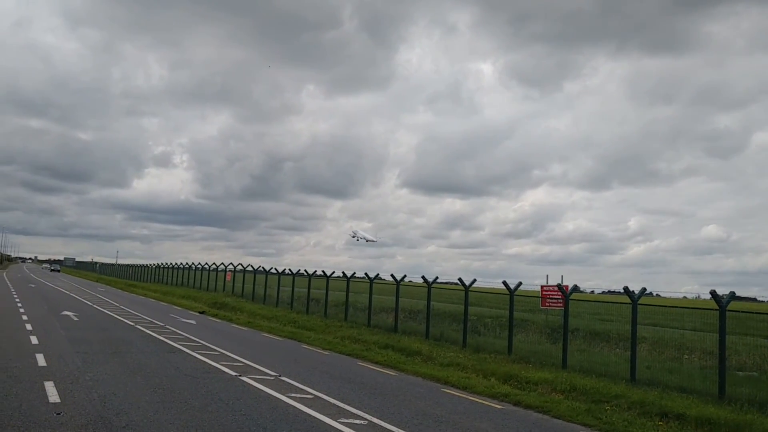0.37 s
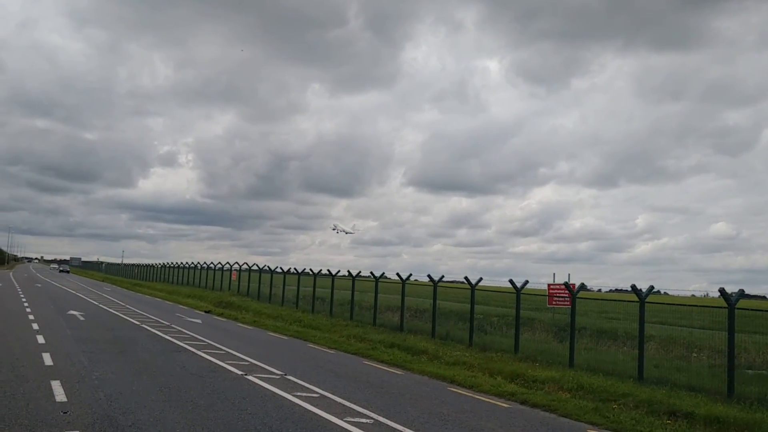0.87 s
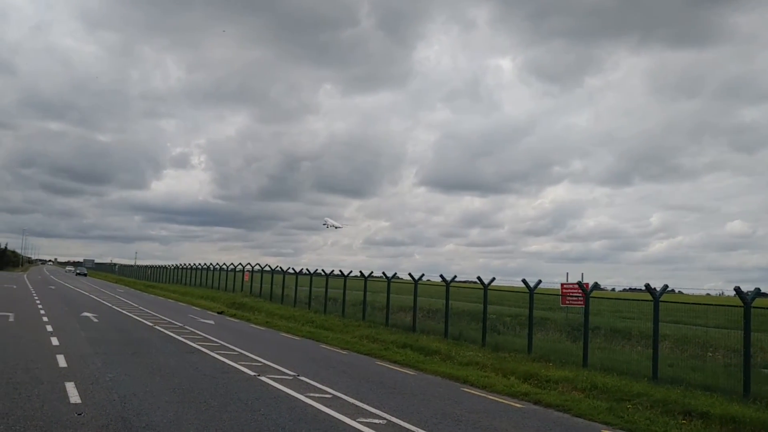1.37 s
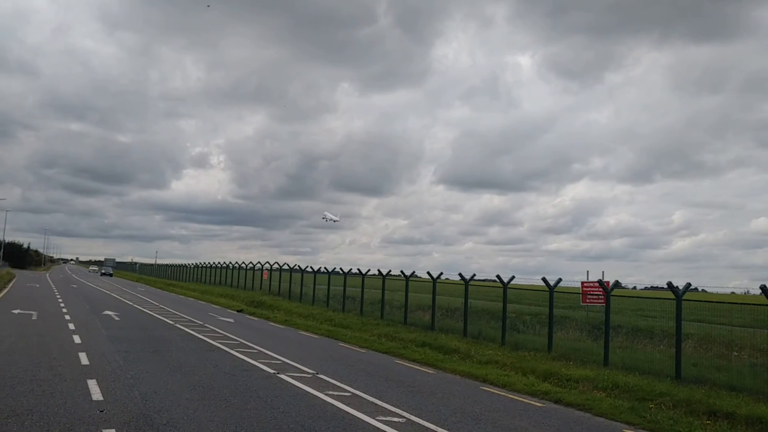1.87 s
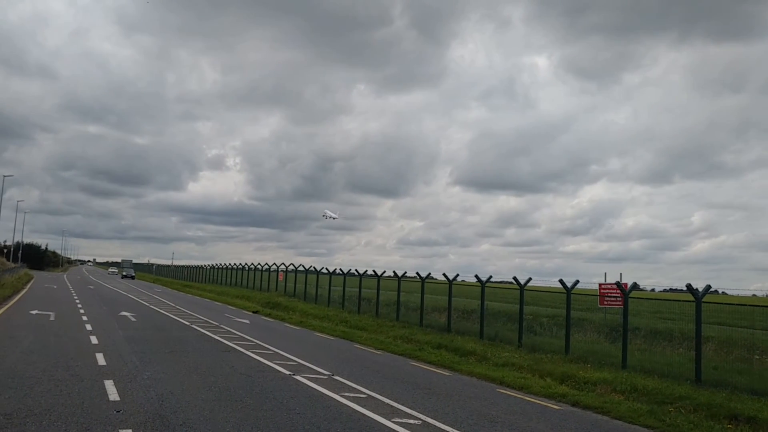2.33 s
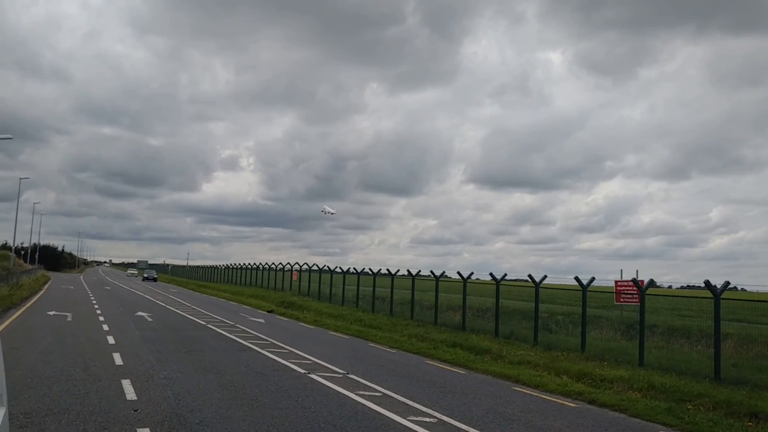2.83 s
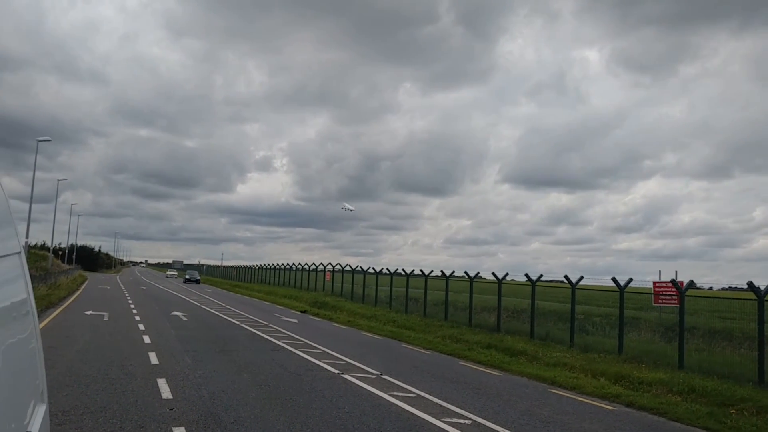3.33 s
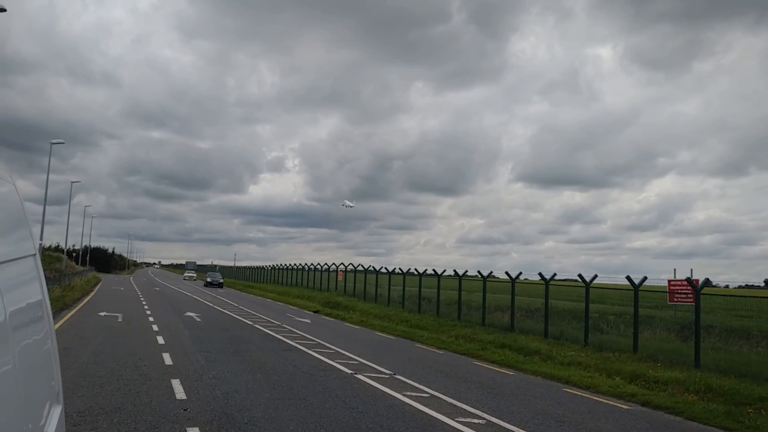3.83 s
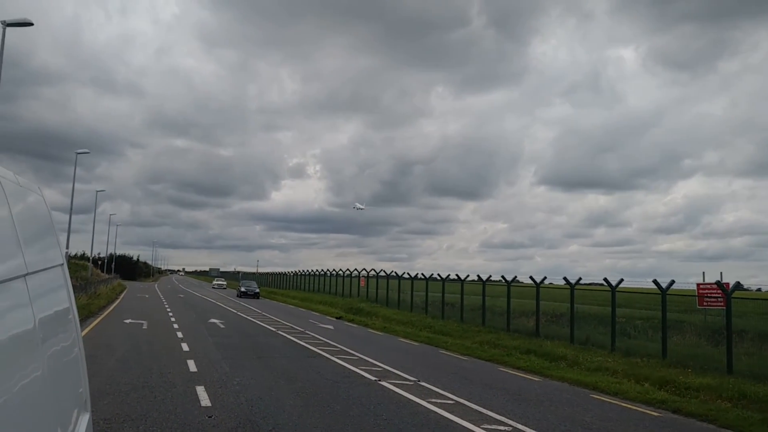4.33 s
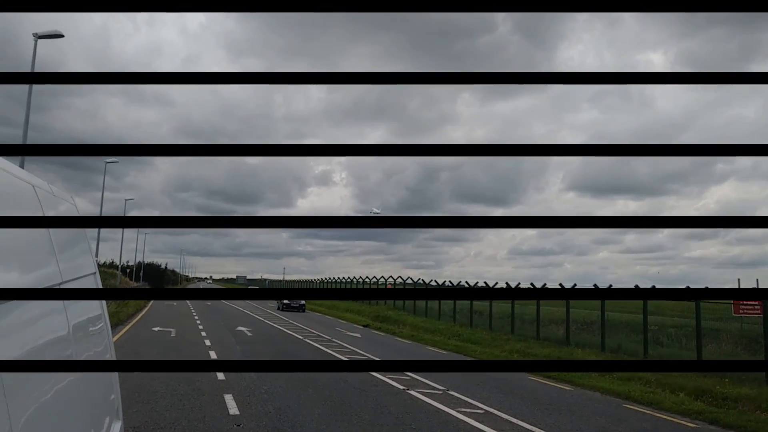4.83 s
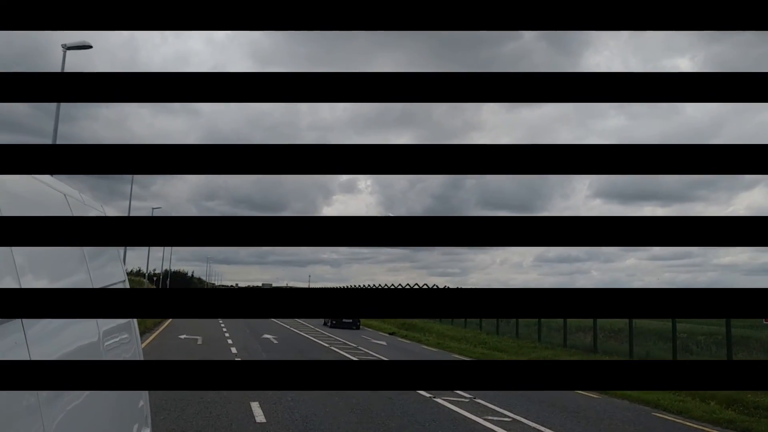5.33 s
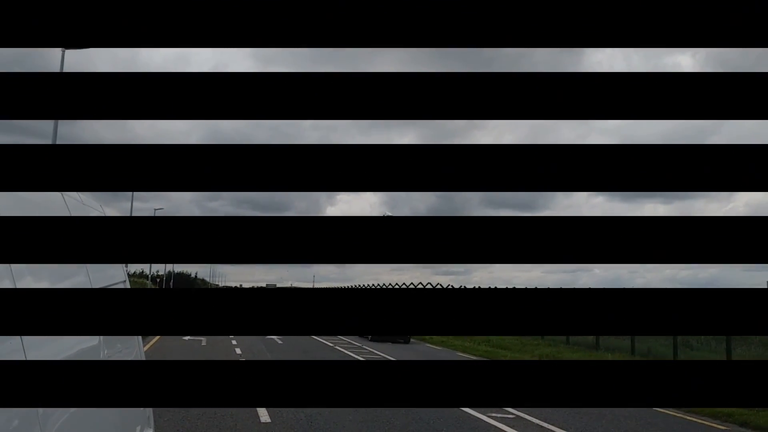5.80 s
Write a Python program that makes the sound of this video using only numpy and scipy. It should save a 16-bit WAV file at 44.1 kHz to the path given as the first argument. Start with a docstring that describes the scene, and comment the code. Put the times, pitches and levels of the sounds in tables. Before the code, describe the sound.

Continuous distant jet roar in open air: unsteady low rumble, coarse mid-range rush and soft hiss swelling and passing. Tiny high peeps on the right open the scene, followed by a few dry snaps, very thin gliding bird notes and a brief chirp near four seconds. One hard click follows, and the whole sound gradually fades, still faintly audible at the end. Wide stereo pickup beside a road.

```python
"""Beside a parked van, two spaced microphones face a roadside fence as a jet airliner climbs away beyond it.
From the start: shaped noise makes the exhaust rumble, with a ground-echo notch, and the roar with a near echo;
wandering tones make the fan whistle, high noise the rustle and passing hiss, sines a far bird's peeps (to 1.4 s).
Tiny noise snaps begin at 0.7 s; gliding sines give thin bird notes from 1.8 s and a chirp on the right at 3.9 s.
A decaying jump ticks sharply at 4.5 s, and from 4.8 s everything fades, not quite to silence."""
import sys
import numpy as np
from scipy import signal
from scipy.fft import rfft, irfft
from scipy.io import wavfile
from scipy.ndimage import uniform_filter1d, map_coordinates

SR = 44100
rng = np.random.default_rng(int(sys.argv[2]) if len(sys.argv) > 2 else 0)


def file_out(sig):
    """Save sig as 16-bit WAV at sys.argv[1]."""
    # one column per channel
    cols = np.atleast_2d(sig).T
    # limit, then scale
    lim = np.clip(cols, -1, 1)
    pcm = np.round(lim * 32767).astype(np.int16)
    wavfile.write(sys.argv[1], SR, pcm)


def makeup_ratio(level_db):
    """Linear amplitude ratio for a level in decibels (20 dB per factor of ten)."""
    decades = np.asarray(level_db, float) / 20
    return 10 ** decades


N = 272755


def rms_one(x):
    """Scale to rms 1."""
    return x / np.sqrt(np.mean(x ** 2) + 1e-20)


def in_time(rows):
    """Columns of a curve table at every sample."""
    s, *columns = np.transpose(rows)
    return [np.interp(np.arange(N) / SR, s, column) for column in columns]


def at_hz(points):
    """A (f/Hz, value) table on the frequency grid of the whole length."""
    hz, value = np.transpose(points)
    grid_hz = np.arange(N // 2 + 1) * SR / N
    return np.interp(np.log(grid_hz + 1), np.log(hz), value)


def coloured(gain, channels=1):
    """White noise shaped by a gain for every frequency."""
    white = rng.standard_normal((channels, N))
    return irfft(rfft(white) * gain, N)


def drift(rate):
    """Slow chance: straight lines between random knots, rate knots a second, spread about 1."""
    knots = rng.standard_normal(400)
    return np.interp(np.arange(N) / SR * rate, np.arange(len(knots)), knots) * np.sqrt(3 / 2)


def bumps(rows):
    """Sum of bell-shaped changes (t/s, size, half length/s to 1/e)."""
    s = np.arange(N) / SR
    return sum(size * np.exp(-((s - at) / half) ** 2) for at, size, half in rows)


def delayed(x, ms):
    """Read x later by a fixed or moving delay."""
    return map_coordinates(x, [np.arange(N) - ms * SR / 1000], order=3, mode="mirror")


def right_lag():
    """Delay in ms of the right microphone, which hears the jet later, less so as the pair turns."""
    lag_ms, lag_ms_per_s = 0.42, -0.032
    return lag_ms + lag_ms_per_s * np.arange(N) / SR


def whistling(hz, width_hz):
    """A tone whose strength and phase wander within a narrow band; a varying width speeds the wander up."""
    knots = signal.lfilter([1], [1, -1.5, .5625], rng.standard_normal((2, N)))
    steps = np.cumsum(width_hz * np.ones(N)) / SR * np.pi / np.log(4 / 3)
    wander = [np.interp(steps, np.arange(N), k) for k in knots]
    turn = 2 * np.pi * np.cumsum(hz * np.ones(N)) / SR
    return rms_one(wander[0] * np.cos(turn) + wander[1] * np.sin(turn))


def evened(x, window_s, amount):
    """Take out part of the chance swells of a noise."""
    level = np.sqrt(uniform_filter1d(x ** 2, int(window_s * SR)) + 1e-6)
    return rms_one(x / level ** np.clip(amount, 0, 1))


def rumble():
    """Large eddies of the exhaust; ground echoes cancel the upper part around a notch that mostly rises."""
    # course before surges and lumps: t/s, deep level/dB, upper level/dB
    course = [(0, -19, -31), (.35, -24, -30.5), (.7, -23, -30.5), (1.15, -23.5, -29.5), (1.6, -23, -30.5),
              (2.0, -24.5, -28.5), (2.4, -24, -27), (3.0, -24, -25), (3.7, -29, -27.5), (4.05, -32, -28),
              (4.4, -28.5, -25.5), (4.8, -28, -27.5), (5.2, -30.5, -27), (5.7, -25, -24), (6.18, -29, -29)]
    # ground echo: t/s, first notch f/Hz, echo strength/0-1
    ground = [(0, 398, 0.95), (.7, 363, 0.68), (1.1, 500, 0.77), (1.7, 582, 0.59), (2.3, 618, 0.39),
              (2.8, 580, 0.45), (3.2, 582, 0.43), (3.8, 640, 0.62), (4.6, 644, 0.08), (6.18, 600, 0.2)]
    # brief surges and lapses of the deep part: t/s, change/dB, half length/s
    surges = [(.76, -15, 0.016), (.89, 6, 0.015), (.95, -4, .03), (1.08, 0, .025), (1.2, 2.5, 0.07),
              (1.34, -1, .035), (2.12, -15, 0.053), (2.19, 5, 0.017), (2.3, 1, 0.037), (2.5, -7.5, 0.073),
              (2.73, 2.5, 0.05), (2.81, -9, 0.031), (2.91, -4, 0.022), (3.0, 4.5, 0.025), (3.23, -7, 0.018),
              (3.3, 5.5, 0.057), (3.39, 3.5, 0.026), (3.44, -1, 0.025), (3.68, 6, 0.095), (3.78, -9, 0.025),
              (3.83, 11, 0.021), (4.04, 0.5, 0.051), (4.15, 7, .02), (4.18, -7, 0.0078), (4.22, 9.5, 0.026),
              (4.28, -1, 0.022), (4.44, -6, 0.0092), (4.59, 2.5, 0.035), (4.68, 0, 0.029),
              (4.73, 10.5, 0.013), (5.1, -10, 0.033), (5.15, 7, 0.018)]
    # spectra of the two parts: f/Hz, relative density/dB
    deep_spectrum = [(12, -57), (20, -20), (34, -11), (54, 7.5), (76, 16), (130, -7.5), (170, -36.5),
                     (290, -120)]
    upper_spectrum = [(59, -59), (100, 1), (150, -1.5), (200, -2), (270, -4.5), (345, -6.5), (505, -18),
                      (700, -38.5), (910, -29), (1540, -120)]
    throb_hz, throb_width_hz, throb_db = 55.07, 14, -3   # level against the deep noise
    upper_follows = 0.26   # share of a surge that the upper part joins
    lumps_db = 1           # spread of chance lumps shared by both parts
    right_lag_ms, side_db = 0.12, -41.5

    deep_db, upper_db = in_time(course)
    surge = bumps(surges)
    lumps = lumps_db * drift(9.0)
    deep_db = deep_db + surge + lumps
    upper_db = upper_db + upper_follows * surge + lumps

    throb = whistling(throb_hz, throb_width_hz)
    deep = rms_one(coloured(makeup_ratio(at_hz(deep_spectrum)))[0]) + makeup_ratio(throb_db) * throb
    upper_gain = makeup_ratio(at_hz(upper_spectrum))
    upper = coloured(upper_gain)[0]
    notch_hz, strength = in_time(ground)
    for bounce in range(2):   # road and verge both send an echo, so the notch is wide
        upper = upper + strength * delayed(upper, 500 / notch_hz)   # half a period, in ms

    mid = makeup_ratio(deep_db) * evened(deep, 0.027, 0.66) + makeup_ratio(upper_db) * evened(upper, 0.14, 0.22)
    side = makeup_ratio(upper_db + side_db) * rms_one(coloured(upper_gain)[0])   # opposite in the two channels
    return np.array([mid + side, delayed(mid, right_lag_ms) - side])


def roar():
    """Fine turbulence: a direct wave and sound scattered by the air, both with a near echo."""
    # near echo: t/s, left delay/ms, right delay/ms, left strength/0-1, right strength/0-1
    near_echo = [(0, 1.13, 0.95, 0.3, 0.04), (1, 0.58, 0.64, 0.13, 0.06), (2, 0.73, 0.98, 0, 0.01),
                 (2.35, 0.76, 0.908, 0.33, 0.34), (3, 0.76, 0.923, 0.27, 0.36),
                 (4.2, 0.85, 0.918, 0.04, 0.41), (4.8, 0.63, 0.84, 0.15, 0.39),
                 (5.1, 1.147, 0.98, 0.3, 0.27), (6.18, 1.075, 1, 0.11, 0.07)]
    # the roar as the air carries it: t/s, swell/dB, brightness/dB
    air = [(0, 5.5, 2.5), (.4, 2, -1.5), (.8, 1.5, 0.5), (.95, 3, 1.5), (1.15, 4, 2), (1.4, 2.5, 1.5),
           (1.8, 4.5, 2), (2.15, 4, 0), (2.4, 6, 1), (2.56, 5.5, 0.5), (2.68, 10, 1.5), (2.85, 6.5, 2),
           (3.05, 10.5, -1.5), (3.3, 11.5, 3), (3.6, 13.5, -1), (4.05, 14.5, 0), (4.35, 12.5, -2.5),
           (4.7, 12.5, -3.5), (5.2, 11, 0.5), (5.55, 14, -1.5), (5.75, 15, 0), (5.95, 12, 1.5),
           (6.18, 12, 0.5)]
    # five parts, low to top: level/dB before the changes below, share of swell, share of brightness,
    # trend/(dB/s), left-right/dB at the start, turning/(dB/s)
    part_settings = [(-51.5, 0.83, 0.067, 0.7, -4.5, 1), (-53.5, 0.78, -0.19, 0.42, -9.5, 0.44),
                     (-54.5, 1.077, 0.68, -0.55, -9.5, 0.06), (-56.5, 0.36, 1, -0.26, -5, 1.5),
                     (-61, 0.19, 0.42, -1.4, -9, -0.5)]
    # the second part leans left for a while: t/s, left-right change/dB, half length/s
    lean = [(2.85, 4.5, 0.68), (3.5, 4.5, 0.51), (4.5, 4.5, 0.67)]
    # the lowest part grows or thins for a while: t/s, change/dB, half length/s
    low_changes = [(.2, -1.5, 0.2), (1.3, 1.5, 0.49), (2.75, -3, 0.4)]
    # hollow band before its wander: t/s, centre f/Hz, width/Hz, level/dB, right-hand shoulder level/dB
    hollow = [(0, 877, 253.6, -75, -68), (.8, 950, 301.6, -61, -64), (.93, 899.5, 401, -47, -54),
              (1.45, 900, 400.4, -44, -60), (2.0, 903, 300.8, -52.5, -59), (2.38, 850, 350.3, -44.5, -63),
              (2.5, 860, 400.7, -39.5, -54), (2.75, 899, 419.2, -39, -52), (3.1, 978, 382, -41.5, -52.5),
              (3.5, 1039, 302, -43, -40.5), (3.9, 1042, 320, -45, -42), (4.2, 1058, 300.2, -46.5, -40.5),
              (4.8, 1049, 170.4, -43, -45), (5.1, 1040, 160.3, -40, -45), (5.4, 1032, 169.2, -39.5, -42),
              (5.75, 1030, 199.6, -42.5, -45), (6.18, 1020, 201, -51, -52)]
    # power share that arrives scattered, unlike in the two channels: f/Hz, share/0-1
    scattered = [(300, 0), (700, 0.21), (1500, 0.13), (3000, 0.68), (8000, 0.7)]
    # spectra of the five parts, low to top: f/Hz, relative density/dB
    low_spectrum = [(260, -13), (450, -1.5), (507, -3), (689, -1.5), (780, -5.5), (1080, -2), (1300, -17),
                    (1690, -40), (2860, -120)]
    middle_spectrum = [(710, -26), (1200, -4), (1460, 4), (1690, 0), (1900, -9.5), (2470, -41),
                       (4180, -120)]
    high_spectrum = [(1060, -30), (1800, -5), (2170, -2.5), (2290, -5.5), (2500, -3), (2720, -7),
                     (3200, -21), (4160, -19), (7040, -120)]
    hiss_spectrum = [(1710, -34), (2900, 0.5), (3560, 0.5), (3960, -4.5), (4390, -1.5), (4900, -7.5),
                     (6370, -33), (10800, -120)]
    top_spectrum = [(2760, -22.5), (4700, 4), (6100, -3.5), (6640, -7.5), (7200, -11), (8480, -20.5),
                    (9000, -35.5), (11700, -54), (19800, -120)]
    low_lag_share = 0.7   # long waves bend round the housing and lag less
    grain_db = 0.46       # quick unevenness shared by all parts
    shoulder_hz, shoulder_width_hz = 1171, 220
    hollow_wander_hz, ragged_db = 15, 0.9

    s, lag = np.arange(N) / SR, right_lag()
    swell, bright = in_time(air)
    levels, pans = [], []
    for level_db, swell_share, bright_share, trend, pan, turning in part_settings:
        levels.append(level_db + swell_share * swell + bright_share * bright + trend * s)
        pans.append(pan + turning * s)
    levels[0] = levels[0] + bumps(low_changes)
    pans[1] = pans[1] + bumps(lean)
    grain = grain_db * drift(40.0)

    centre, width, hollow_db, shoulder_db = in_time(hollow)
    howl = whistling(centre + hollow_wander_hz * drift(3.0), width)
    howl = makeup_ratio(hollow_db + ragged_db * drift(7.0)) * howl
    shoulder = whistling(shoulder_hz, shoulder_width_hz)
    shoulder = makeup_ratio(shoulder_db + ragged_db * drift(7.0)) * shoulder
    both = np.array([howl, delayed(howl, low_lag_share * lag) + shoulder])

    share = np.clip(at_hz(scattered), 0, 1)
    spectra = (low_spectrum, middle_spectrum, high_spectrum, hiss_spectrum, top_spectrum)
    lag_shares = (low_lag_share, low_lag_share, 1, 1, 1)
    for spectrum, db, pan_db, lag_share in zip(spectra, levels, pans, lag_shares):
        gain = makeup_ratio(at_hz(spectrum))
        gain = gain / np.sqrt(np.mean(gain ** 2))
        direct = coloured(gain * np.sqrt(1 - share))[0]
        pair = np.array([direct, delayed(direct, lag_share * lag)])
        pair = pair + coloured(gain * np.sqrt(share), channels=2)
        waver_db = 1.0 + 0.86 * drift(9.)   # gusty air makes each part waver, about 1 dB up
        both = both + pair * makeup_ratio(db + waver_db + grain + np.array([pan_db / 2, -pan_db / 2]))

    left, right = both
    left_ms, right_ms, left_strength, right_strength = in_time(near_echo)
    return np.array([left + left_strength * delayed(left, left_ms),
                     right + right_strength * delayed(right, right_ms)])


def fan():
    """Blade tones of both engines, sagging as the jet draws away, at their own strength in each microphone."""
    # gain on the mix of tones and skirt: t/s, left level/dB, right level/dB
    whistle_level = [(0, -69, -64), (.9, -58.5, -67.5), (1.4, -54.5, -49), (1.8, -55, -62), (2.3, -58, -61),
                     (2.6, -52, -47), (3.0, -54, -40), (3.4, -59, -50), (3.7, -65, -46.5),
                     (4.3, -68, -41.5), (5.1, -64, -56), (5.7, -60, -42), (6.18, -56, -42.5)]
    start_hz, sag_hz_per_s, tone_width_hz = 2174, 8, 20
    skirt_width_hz, skirt_db = 480, 3.5   # a rough band surrounds the tones
    first_db, second_db = -2.5, -9
    second_shift_hz = 20   # the other engine turns a little faster
    flutter_db = 2.5       # turbulent air breaks the tones into strands

    left_db, right_db = in_time(whistle_level)
    hz = start_hz - sag_hz_per_s * np.arange(N) / SR
    tone = makeup_ratio(skirt_db) * whistling(hz, skirt_width_hz)
    for shift_hz, db in ((0, first_db), (second_shift_hz, second_db)):
        strand_level = makeup_ratio(db + flutter_db * drift(4.4))
        tone = tone + strand_level * whistling(hz + shift_hz, tone_width_hz)
    return np.array([makeup_ratio(left_db) * tone, makeup_ratio(right_db) * delayed(tone, right_lag())])


def rustle():
    """Breeze-stirred grass and cloth: noise unlike in the channels, striped by an echo shifting as they turn."""
    # level between gusts, before lift and unevenness: t/s, lower level/dB, upper level/dB
    calm = [(0, -64, -88.5), (.6, -77, -79.5), (1.3, -73.5, -87), (1.6, -85.5, -88.5), (2.4, -79, -84),
            (3.1, -78, -80.5), (3.5, -88, -83.5), (4.2, -76.5, -82.5), (4.5, -69.5, -83), (5.3, -59.5, -73),
            (5.8, -57, -82.5), (6.18, -49.5, -73)]
    # gusts in the upper part: t/s, rise/dB, half length/s
    gusts = [(.21, 1.5, 0.05), (1.55, 6.5, 0.17), (1.82, 6, 0.25), (2.3, 2.5, 0.081), (3.36, 4, 0.17),
             (3.78, 6, 0.15), (4.02, 5, 0.16), (4.42, 3, 0.069)]
    # spectrum: f/Hz, relative density/dB
    leaves = [(4410, 1), (7500, -2), (10500, -4.5), (11400, -6), (12200, -6.5), (13600, -7), (14300, -11),
              (16000, -24)]
    split_hz = 12300
    echo_ms, echo_strength, echo_shift_ms = .9, .3, .012
    calm_pan_db, gust_pan = -9.5, -2.4   # left-right dB, and its change per dB of gust

    lower_db, upper_db = in_time(calm)
    gust = bumps(gusts)
    upper_db = upper_db + gust
    pan_db = calm_pan_db + gust_pan * gust

    striped = []
    for channel in coloured(makeup_ratio(at_hz(leaves)), channels=2):
        echo = delayed(channel, echo_ms + echo_shift_ms * drift(1.6))
        striped.append(channel + echo_strength * echo)
    out = 0
    for kind, db in (("low", lower_db), ("high", upper_db)):
        part = signal.sosfilt(signal.butter(4, split_hz, kind, fs=SR, output="sos"), np.array(striped))
        out = out + rms_one(part) * makeup_ratio(db + 1.5 + 2.0 * drift(7.8))   # 1.5 dB lift, uneven by 2 dB
    return out * makeup_ratio(np.array([pan_db / 2, -pan_db / 2]))


def swish():
    """Bands of hiss that swell and pass, each a wandering tone in a bell-shaped envelope."""
    # bands: t/s, centre f/Hz, peak level/dB in the nearer channel, half length/s, left-right/dB
    bands = [(1.32, 4470, -50.5, 0.46, -19), (2.65, 5400, -60.5, 0.33, -15.5), (2.85, 3550, -56, .4, 19),
             (5.39, 6020, -65, 0.45, 4), (1.33, 1456, -47, 0.44, -6.5), (2.85, 1658, -47, .35, 6),
             (4.2, 1680, -50, 0.67, 17), (1.13, 700, -52, .4, -2), (5.43, 720, -43.5, .6, 0),
             (6.3, 1700, -47, 0.79, -11), (4.0, 1500, -50, .5, -13.5), (5.65, 2217, -44.5, 0.22, 2),
             (2.48, 950, -52, 0.22, -10), (2.5, 2700, -51.5, 0.21, -11), (3.4, 2600, -50, 0.32, 14),
             (4.13, 2350, -45.5, 0.37, -13), (.12, 630, -48, 0.33, -2), (1.0, 1200, -51.5, 0.16, 1),
             (3.1, 1990, -47.5, .4, -14)]
    width_hz = 700
    out = 0
    for at, hz, db, half, pan in bands:
        band = bumps([(at, makeup_ratio(db), half)]) * whistling(hz, width_hz)
        out = out + band * makeup_ratio([[min(pan, 0)], [min(-pan, 0)]])
    return out


def peeps():
    """A far bird on the right: short fluttering sine notes that dip in pitch and come back."""
    # notes: middle t/s, level/dB before the flutter, lowest f/Hz
    peep_notes = [(.02, -55, 6350), (.17, -66, 6400), (.335, -65, 6450), (.49, -61, 6250),
                  (.662, -59, 6270), (.835, -58, 6420), (.98, -62, 6550), (1.16, -59, 6460),
                  (1.33, -59, 6470)]
    edge_hz, length_s = 6750, 0.055
    left_db, flutter_db = -15, 2.5
    out, s = np.zeros(N), np.arange(int(length_s * SR)) / SR
    arch = np.sin(np.pi * s / length_s)
    for middle, db, low_hz in peep_notes:
        hz = edge_hz - (edge_hz - low_hz) * arch
        note = np.sqrt(arch) * np.sin(2 * np.pi * np.cumsum(hz) / SR)
        start = max(int((middle - length_s / 2) * SR), 0)
        out[start:start + len(s)] += makeup_ratio(db) * note
    return out * makeup_ratio(flutter_db * drift(60.0)) * makeup_ratio([[left_db], [0]])


def small_ticks():
    """Tiny dry snaps without any bass, nearer the right: very short bursts of noise."""
    # snaps: t/s, level/dB before the bass cut
    snap_times = [(0.6963, -50), (2.2623, -57), (3.158, -55), (3.1694, -54), (3.41, -57)]
    cut_hz, left_db, fall_ms = 6500, -12, 1.5
    s = np.arange(N) / SR
    fall = sum(makeup_ratio(db) * (s >= at) * np.exp(-np.abs(s - at) * 1000 / fall_ms) for at, db in snap_times)
    snaps = fall * rng.standard_normal(N) + 1e-18
    high = signal.sosfilt(signal.butter(4, cut_hz, "high", fs=SR, output="sos"), snaps)
    return high * makeup_ratio([[left_db], [0]])


def bird():
    """Thin gliding sines on the right: notes that fall, rise and arch, and a chirp that leaps up with an echo."""
    # every note: t/s, f/Hz, level/dB in the right channel
    falling = [(1.78, 12200, -84), (1.85, 11500, -74), (1.95, 10800, -77), (2.03, 10200, -73),
               (2.07, 9500, -84)]
    rising = [(3.06, 9800, -82), (3.09, 10150, -71), (3.14, 11000, -78), (3.17, 12000, -67),
              (3.2, 12600, -73), (3.25, 13000, -73), (3.27, 13100, -84)]
    arching = [(3.77, 10500, -80), (3.8, 10800, -69), (3.87, 10900, -73), (3.91, 11300, -57),
               (3.94, 10910, -61), (3.99, 10580, -67), (4.04, 10300, -74), (4.11, 9900, -78)]   # around the chirp
    chirp = [(3.879, 5600, -60), (3.886, 7360, -52), (3.893, 8230, -45), (3.903, 8330, -40),
             (3.909, 8200, -47), (3.912, 8160, -58), (3.916, 8000, -55), (3.922, 7800, -48),
             (3.925, 7600, -70)]
    chirp_echo = [(3.908, 8280, -70), (3.914, 8270, -55), (3.925, 8260, -60), (3.94, 8250, -64),
                  (3.96, 8250, -76)]   # of the chirp's top
    left_db = -34
    s, out = np.arange(N) / SR, 0
    for note in (falling, rising, arching, chirp, chirp_echo):
        hz, db = in_time(note)
        sounding = (s > note[0][0]) * (s < note[-1][0])
        out = out + np.sin(2 * np.pi * np.cumsum(hz) / SR) * makeup_ratio(db) * sounding
    return out * makeup_ratio([[left_db], [0]])


def tick():
    """A sudden jump of the signal, alike in both channels, that sinks back at once."""
    at_s, level_db, fall_ms = 4.5161, -11, 0.9
    since = np.arange(N) / SR - at_s
    return makeup_ratio(level_db) * (since >= 0) * np.exp(-np.abs(since) * 1000 / fall_ms)


def scene():
    """The jet, rustle, hiss bands, bird notes and snaps, plus one sharp tick: a bare jump of the signal."""
    jet = rumble() + roar() + fan()
    return jet + rustle() + swish() + peeps() + small_ticks() + bird() + tick()


def top_cut(x):
    """Nothing passes above the cut-off."""
    return signal.sosfilt(signal.butter(12, 16510, fs=SR, output="sos"), x)


def record(dry):
    """The deepest bass is cut, peaks are rounded, start and end are faded."""
    bass_cut_hz, ceiling = 37.5, .5   # ceiling as a share of full scale
    fade_in_s, fade_start_s, fade_end_s = .012, 4.79, 6.372   # the sound stops before the fade ends
    s = np.arange(N) / SR
    heard = signal.sosfilt(signal.butter(4, bass_cut_hz, "high", fs=SR, output="sos"), dry)
    heard = ceiling * np.tanh(heard / ceiling)
    heard = heard * np.clip((fade_end_s - s) / (fade_end_s - fade_start_s), 0, 1)
    heard = heard * np.minimum(s / fade_in_s, 1)
    return top_cut(heard)


dry = scene()
out = record(dry)
file_out(out)
```